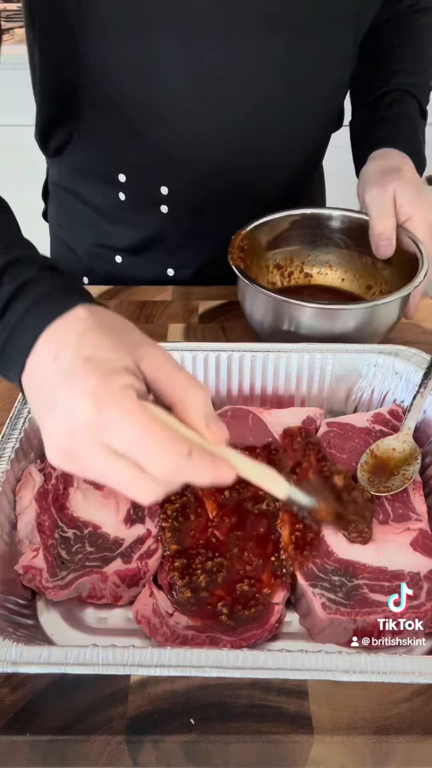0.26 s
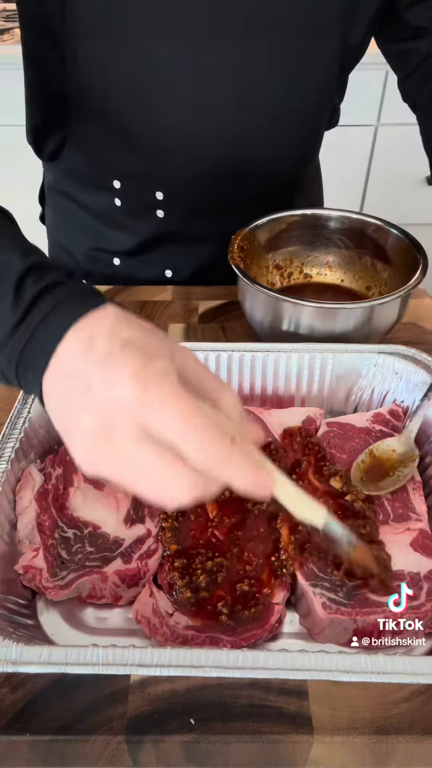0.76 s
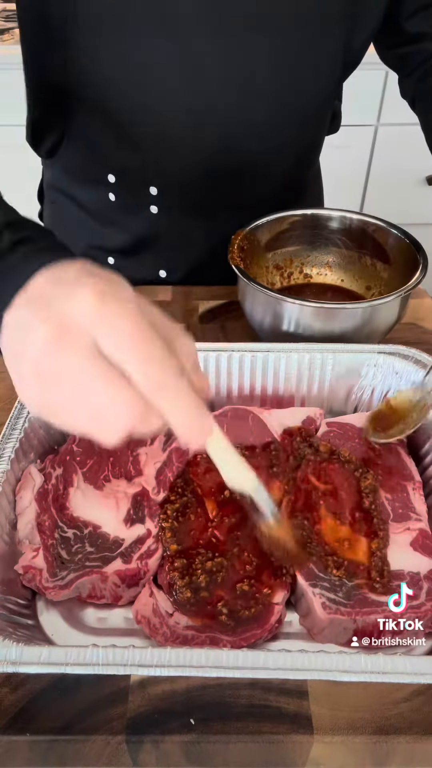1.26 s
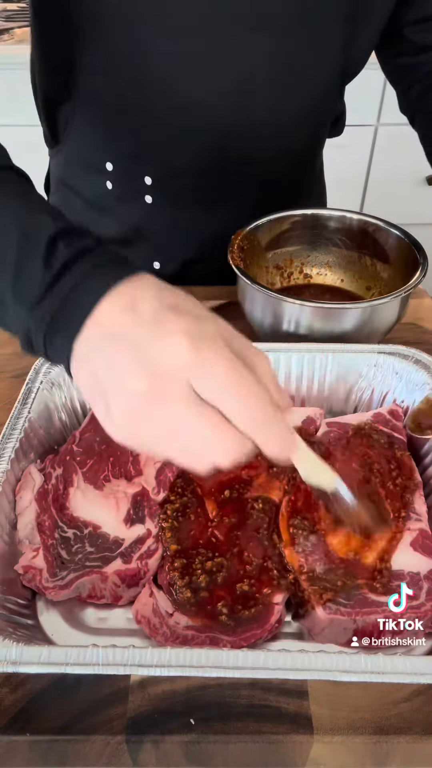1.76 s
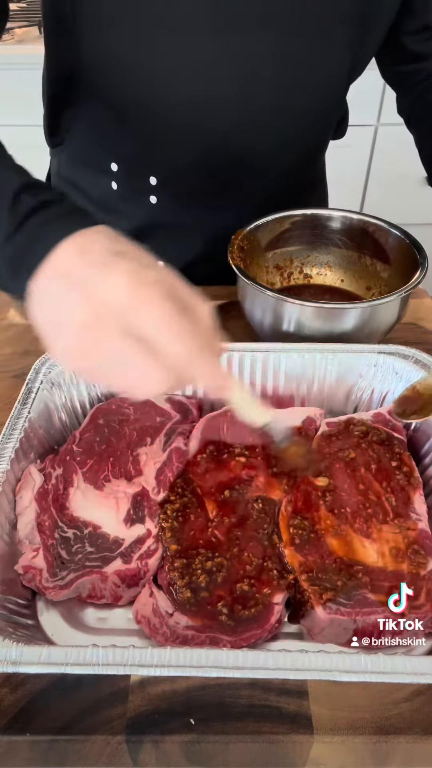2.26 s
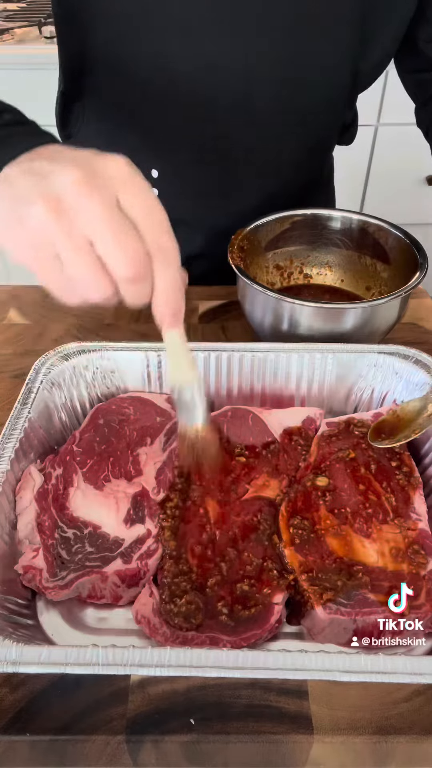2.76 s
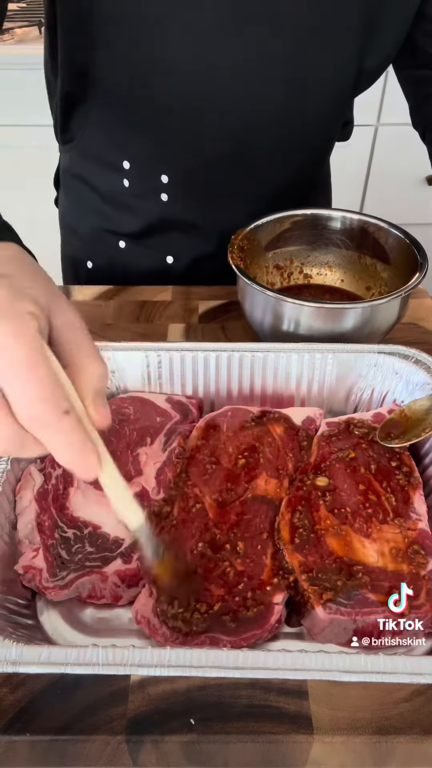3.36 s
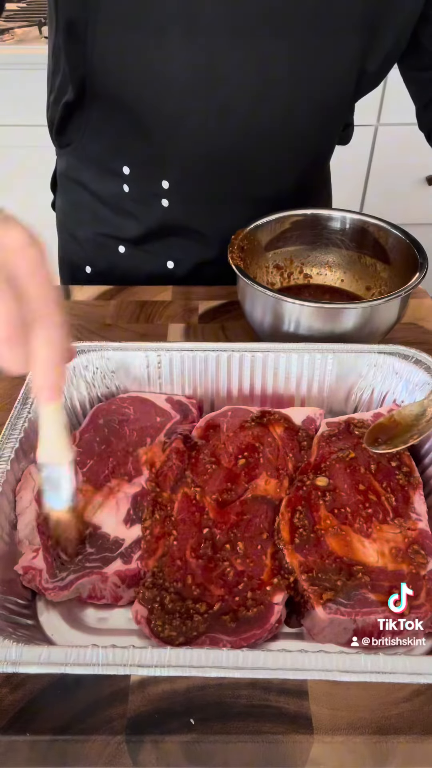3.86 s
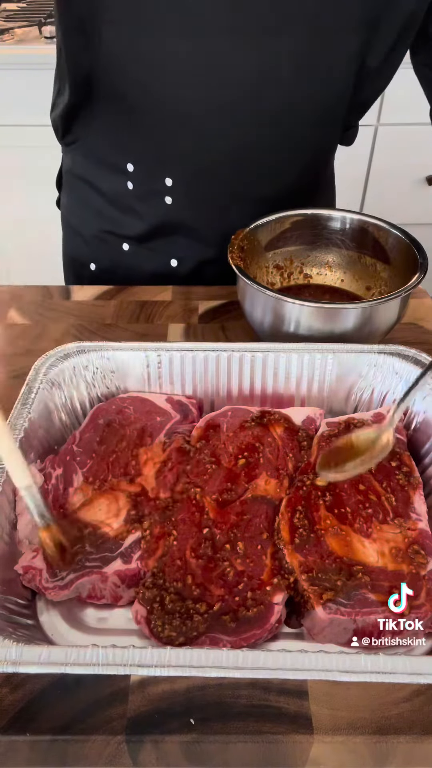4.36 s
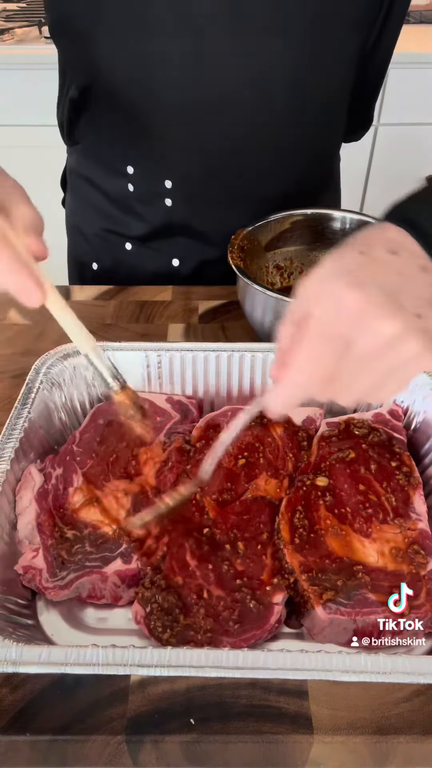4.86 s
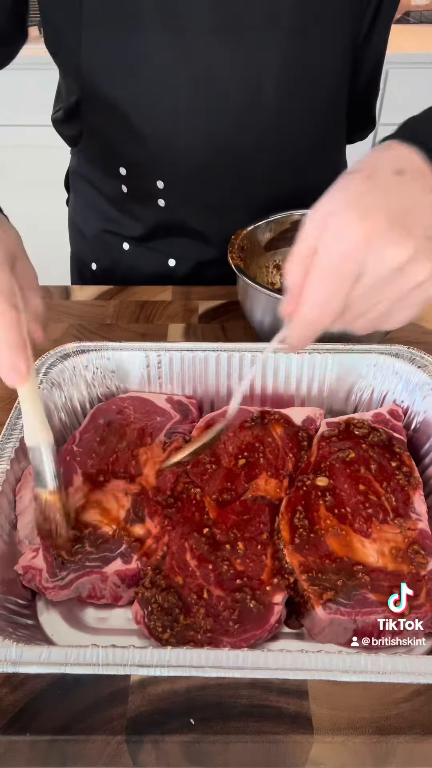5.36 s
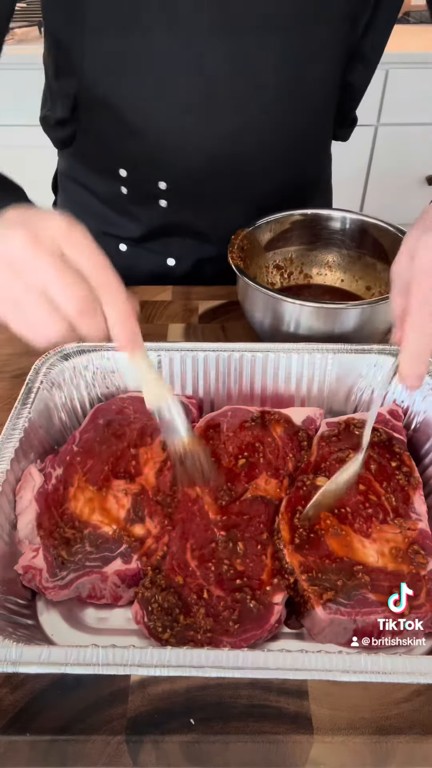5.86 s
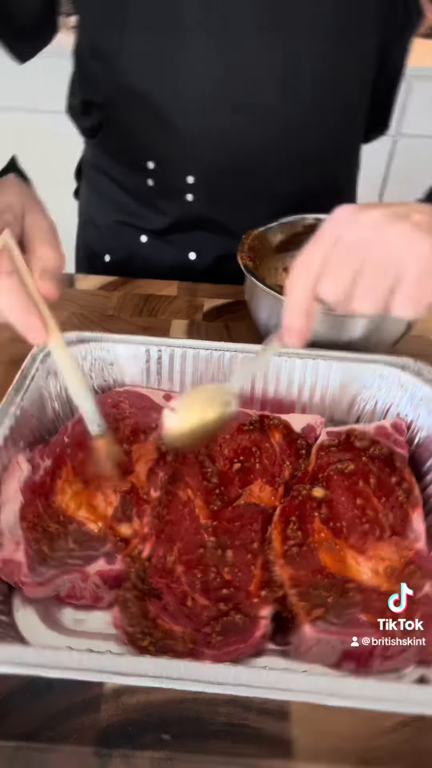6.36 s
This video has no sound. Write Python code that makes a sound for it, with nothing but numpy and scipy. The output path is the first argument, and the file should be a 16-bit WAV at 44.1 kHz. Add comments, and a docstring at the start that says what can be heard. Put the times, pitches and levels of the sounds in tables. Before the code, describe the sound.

In a quiet kitchen, a nudged bowl makes a soft, low thud on a wooden board. A spoon shifts against a foil tray, which buckles in two short clatters, the second louder. Then a brush spreads marinade over steaks in faint, quick swishes, with small sticky ticks and squelches. The microphone is close, and a faint appliance hum lies underneath.

```python
"""A quiet kitchen, a phone microphone close to a foil tray of steaks being brushed with marinade.
First a bowl is nudged and the wooden board gives a soft thud. Around the one-second mark a spoon
moves against the tray, and the foil buckles in two short clatters. Then wet bristles swish over
the meat and films of sticky sauce tick as they break. A faint appliance hum lies under it all."""
import sys
import numpy as np
from scipy import signal
from scipy.fft import rfft, irfft, next_fast_len
from scipy.io import wavfile
from scipy.ndimage import map_coordinates

SR = 44100
rng = np.random.default_rng(int(sys.argv[2]) if len(sys.argv) > 2 else 0)


def generate_wav(signal):
    """Clip the signal to [-1, 1] and save it as 16-bit WAV at the path in sys.argv[1]."""
    frames = np.transpose(np.atleast_2d(signal))
    scaled = np.clip(frames, -1, 1) * 32767
    pcm = np.round(scaled).astype(np.int16)
    wavfile.write(sys.argv[1], SR, pcm)


N = 291774

# the brush going to and fro, about four strokes a second: middle_s, level_db, half_length_s
BRUSH_STROKES = [(0.387, -76, .03), (0.814, -60, .03), (1.377, -65.5, .045), (1.68, -82, .025),
                 (2.012, -64, .025), (2.41, -86, .06), (2.707, -86, 0.022), (3.21, -77.5, .035),
                 (3.512, -74, 0.023), (3.772, -62, 0.036), (3.926, -59, 0.022), (4.098, -77, 0.0233),
                 (4.326, -69, .05), (4.535, -77, .025), (4.739, -75, .028), (5.006, -66.5, 0.031),
                 (5.254, -82, 0.049), (5.525, -78, 0.0513), (5.767, -83, 0.031), (5.925, -77.5, 0.026)]
# the loudest snaps of the sauce: start_s, level_db, pitch_hz
LOUD_SNAPS = [(.0995, -59, 9200), (.2033, -61, 11300), (.3101, -60.5, 11300), (.377, -60.5, 8200),
              (1.475, -50.5, 2630), (2.001, -53.5, 3800), (2.0174, -55, 10900), (2.076, -46.5, 2090),
              (2.079, -51, 3050), (2.2681, -54, 13400), (2.3605, -57, 2880), (2.4278, -65, 11750),
              (3.0108, -54.5, 9200), (3.041, -57.5, 4214), (3.7293, -53.5, 9910), (4.21, -58.5, 3300),
              (4.249, -51, 4370), (4.2502, -48, 12000), (4.5338, -50.5, 12000), (4.6402, -50, 12700),
              (4.644, -54.5, 3150), (5.0648, -60, 9630), (5.754, -56, 3860), (5.76, -56, 5530),
              (6.2682, -60.5, 11940)]
# stereo width of diffuse sound: frequency_hz, side_to_mid_db
DIFFUSE_WIDTH = [(60, -23.5), (200, -9), (500, -3.5), (1200, -1.5), (8000, 2), (11000, -17), (15000, -22)]


def tray(crumple_t60=0.045, crack_t60=0.012, swing_t60=.014, swing_hz=1150, flex_s=0.00069, push_s=0.0033):
    """Buckling foil cracks, swings, rings and pushes on the board; the small patch that pops pings."""
    # buckles of the foil: start_s, level_db, relative_crack_db, brightness_db_per_octave
    buckles = [(0.6669, -45, -22.5, 2.5), (.683, -38, -19, -0.5), (0.7045, -41.5, -19.5, 1),
               (0.7169, -37.5, -24, 1.5), (0.7214, -36, -26.5, 1.5), (0.7256, -36.5, -28, 0),
               (0.734, -43, -20.5, 4), (0.9914, -30.5, -23, -1.5), (1.0383, -26.5, -16, 0.87),
               (1.0634, -32, -16, 1.6), (1.188, -42.5, -17.5, -2), (4.986, -68.5, -24, -1.5)]
    # modes of the loaded tray: pitch_hz, level_db, t60_s
    tray_modes = [(468, -11, .28), (511, -13, .2), (578, -11, .09), (637, -11, .11), (662, -11, .2),
                  (871, -7, .13), (913, -10, .13), (997, -9, .12), (1150, -8, .1), (1193, -7, .11),
                  (1233, -3, .1), (1262, -6, .12), (1342, -7, .08), (1533, -6, .1), (1700, -4, .1),
                  (1860, -7, .04), (2140, -18, .18), (2292, -19, .17), (2800, -15, .04), (3550, -13, .03)]
    # modes of the popping patch: pitch_hz, level_db, t60_s
    dimple_modes = [(7600, -1.5, 0.0089), (8374, -0.5, 0.01161), (9550, -6, 0.015), (11000, -13.5, 0.015)]
    # modes of the tray's floor against the board: pitch_hz, level_db, t60_s
    floor_modes = [(112, -15.5, 0.14), (165, -2, .07), (200, -3, .12), (260, 0, 0.026)]
    # dense foil modes, heard as noise: frequency_hz, level_db
    crumple_spectrum = [(250, -23), (450, 8.5), (900, 1), (1700, -2), (2100, -7.5), (2900, -9.5),
                        (4000, -13), (5500, -26), (16000, -37)]
    # the opening crack: frequency_hz, level_db
    crack_spectrum = [(1500, -16), (3800, 1.5), (5300, -7), (8000, -5), (10600, -3), (16000, -9.5)]
    ring_db, swing_db, thump_db, ping_db = -3, -1.5, -16.5, -1.5  # balance within a buckle
    knocks, pings, t = np.zeros(N), np.zeros(N), np.arange(SR // 3) / SR
    for start_s, db, crack_db, brightness_db in buckles:
        noise = rng.standard_normal((2, len(t)))
        crumple = blow(coloured(noise[0], tilted(crumple_spectrum, brightness_db)) * decay(t, crumple_t60))
        modes = blow(ring(tilted(tray_modes, brightness_db), t, scatter_db=5.5))
        # the sheet snaps through, faster for a harder contact, a moment after the crack
        pitch_hz = swing_hz * np.exp(0.13 * brightness_db)
        swing = blow(np.sin(2 * np.pi * pitch_hz * t) * decay(t, swing_t60))
        sheet = amp(ring_db) * modes + crumple + amp(swing_db) * swing
        body = blow(sheet * (1 - np.exp(-t / flex_s)))
        crack = blow(coloured(noise[1], crack_spectrum) * decay(t, crack_t60))
        thump = blow(ring(floor_modes, t, scatter_db=5.5) * (1 - np.exp(-t / push_s)))
        ping = blow(ring(dimple_modes, t, scatter_db=4.5))
        add(knocks, start_s, amp(db) * (body + amp(crack_db) * crack + amp(thump_db) * thump))
        add(pings, start_s, amp(db + crack_db + ping_db) * ping)
    return knocks, pings


def board():
    """Soft blows make the heavy board and counter boom."""
    # blows on the board: start_s, peak_db, brightness_db_per_octave
    nudges = [(0.0173, -32.5, 2.5), (0.029, -37.5, 4.5), (0.065, -33.5, 0.5), (0.138, -44, -23),
              (0.287, -49.5, -2), (2.357, -66.5, -1), (4.987, -54.5, 5.5)]
    # modes of board and counter: pitch_hz, level_db, t60_s
    board_modes = [(74.17, -5.5, 0.46), (94.6, -6.5, 0.18), (119.5, -1, 0.11), (143, -2, 0.071),
                   (217, -7, 0.041), (298, -11.5, 0.028), (469, -24.5, 0.19), (623, -23, 0.031),
                   (990, -32, 0.02)]
    thuds, t = np.zeros(N), np.arange(SR // 2) / SR
    for start_s, peak_db, brightness_db in nudges:
        boom = ring(tilted(board_modes, brightness_db), t, scatter_db=1)
        add(thuds, start_s, amp(peak_db) * boom / np.abs(boom).max())
    return thuds


def brush(grain_db=2.5, clump_db=3.0, pops_per_s=600):
    """Each stroke swells and fades: countless wet bristles let go of the meat, and sticky threads pop."""
    # the swish of wet bristles: frequency_hz, level_db
    bristle_spectrum = [(1500, -24.5), (2800, -11), (3800, 0.5), (5000, -9), (6500, -6), (8500, -3.5),
                        (11000, -0.5), (13000, -3), (16000, -3)]
    power = sum((amp(db) * swell(s, half_s, fall=1.1)) ** 2 for s, db, half_s in BRUSH_STROKES)
    flicks = unit(rng.standard_normal((2, N)) * amp(grain_db * wobble(1500) + clump_db * wobble(270)))
    pops = unit((rng.random(N) < pops_per_s / SR) * rng.standard_normal((2, N)))
    swish = coloured(flicks + .7 * pops, bristle_spectrum)
    return np.sqrt(power) * spread(*swish, DIFFUSE_WIDTH)


def sauce_snaps(tick_t60=0.011, cavity_t60=0.0049, rise=0.19, tick_db=-15):
    """A sauce film breaks with a tick, higher for a smaller film; its cavity rings upward as it opens."""
    # spectrum of a tick: multiple_of_pitch, level_db
    tick_shape = [(.25, -22), (.6, -9.5), (1, 3), (1.5, -8.5), (3.999, -13)]
    ticks, cavities, t = np.zeros(N), np.zeros(N), np.arange(SR // 16) / SR
    glide = 1 + rise * np.minimum(t / cavity_t60, 1)
    for start_s, db, hz in LOUD_SNAPS + torn_films() + faint_films():
        spectrum = [(multiple * hz, level) for multiple, level in tick_shape]
        tick = coloured(rng.standard_normal(len(t)), spectrum) * decay(t, tick_t60)
        cavity = np.sin(2 * np.pi * hz * np.cumsum(glide) / SR) * decay(t, cavity_t60)
        add(ticks, start_s, amp(db + tick_db) * blow(tick))
        add(cavities, start_s, amp(db) * cavity)
    return ticks, cavities


def torn_films(count=2, within_s=.012, relative_db=-10.5, scatter_octaves=0.19):
    """Each loud snap tears neighbouring films, so that it squelches: start_s, level_db, pitch_hz."""
    start_s, db, hz = np.repeat(LOUD_SNAPS, count, axis=0).T
    delay, detune = rng.random((len(start_s), 2)).T
    pitch_hz = hz * 2 ** (scatter_octaves * (2 * detune - 1))
    return list(zip(start_s + within_s * delay, db + relative_db, pitch_hz))


def faint_films(count=3, level_db=-69.5, scatter_db=3.5, scatter_s=0.031):
    """Every stroke breaks a few small films at random: start_s, level_db, pitch_hz."""
    # pitch range of the small films: low_hz, high_hz
    pitch_range = (7070, 14120)
    low_hz, high_hz = pitch_range
    middles = np.repeat([s for s, _, _ in BRUSH_STROKES], count)
    when, strength = rng.standard_normal((len(middles), 2)).T
    pitch_hz = low_hz * (high_hz / low_hz) ** rng.random(len(middles))
    return list(zip(middles + scatter_s * when, level_db + scatter_db * strength, pitch_hz))


def pressing(light_rumble_db=-74.5, light_smear_db=-83):
    """Over a light, constant contact, each press smears sauce and rocks meat and tray on the board."""
    # brush or spoon leaning on the meat: middle_s, half_length_s, rumble_db, smear_db
    presses = [(.4, 0.39, -77.5, -76.5), (2.55, 0.21, -68.5, -83.5), (4.533, 0.063, -75, -68),
               (5.058, 0.058, -63.5, -78.5), (5.407, .2, -65, -92), (5.88, 0.17, -76.5, -79.5)]
    # the board's rumble: frequency_hz, level_db
    rumble_spectrum = [(25, -33.5), (42, -10), (60, 10), (75, -2), (95, -10), (130, -12.5), (250, -16),
                       (500, -57)]
    # thick sauce smearing: frequency_hz, level_db
    smear_spectrum = [(300, -10), (700, -0.5), (1400, -4.5), (2200, -6), (3800, -9.5), (5000, -19.5),
                      (9000, -34.5)]
    rumble_power, smear_power = amp(light_rumble_db) ** 2, amp(light_smear_db) ** 2
    for middle_s, half_s, rumble_db, smear_db in presses:
        pressure = swell(middle_s, half_s, fall=1)
        rumble_power = rumble_power + (amp(rumble_db) * pressure) ** 2
        smear_power = smear_power + (amp(smear_db) * pressure) ** 2
    rumble = np.sqrt(rumble_power) * wash(rumble_spectrum)
    smear = np.sqrt(smear_power) * amp(1.1 * wobble(45)) * wash(smear_spectrum)
    return rumble + smear


def tiled_walls(x, build_s=0.0033):
    """The walls answer with a diffuse tail that dies at its own speed in each band."""
    # the kitchen's reverberation: frequency_hz, t60_s
    reverb_times = [(150, 0.49), (500, 0.24), (2500, 0.71), (6000, 0.6), (14000, 0.26)]
    hz, t, bands = signal.stft(rng.standard_normal((2, SR)), SR, nperseg=256)
    envelope = decay(t, along(reverb_times, hz)[:, None]) * (1 - np.exp(-t / build_s))
    tail = signal.istft(bands * envelope, SR, nperseg=256)[1]
    mid, side = signal.fftconvolve(x[None], tail / np.linalg.norm(tail[0]), axes=1)[:, :N]
    return spread(mid, side, DIFFUSE_WIDTH)


def room_tone(air_db=-70.5):
    """Kitchen air and the slightly unsteady hum of an appliance."""
    # the appliance's tones: pitch_hz, level_db
    hum_tones = [(59.5, -77), (120, -80), (288, -84), (576, -77), (2051, -90.5), (2945, -99), (3596, -95.5)]
    # the air of the kitchen: frequency_hz, level_db
    air_spectrum = [(25, -27), (40, -8.5), (65, -3), (130, -2), (230, -6.5), (380, -9.5), (560, -8),
                    (680, -11), (990, -23.5), (1900, -16), (3700, -30.5), (5000, -43), (14400, -38),
                    (16000, -42)]
    hum, t = np.zeros(N), np.arange(N) / SR
    for hz, db in hum_tones:
        peak = np.sqrt(2) * amp(db + 0.45 * wobble(3.7))
        hum += peak * np.sin(2 * np.pi * hz * t + 1.3 * wobble(2.3))
    return amp(air_db) * wash(air_spectrum) + hum


def amp(db):
    return 10 ** (np.asarray(db) / 20)


def decay(t, t60):
    return amp(-60 * t / t60)


def unit(x):
    return x / np.sqrt(np.mean(x ** 2) + 1e-20)


def blow(x):
    """x scaled to the energy of 20 ms at rms 1."""
    return x / np.sqrt(np.sum(x ** 2) / (.02 * SR))


def swell(middle_s, half_s, fall):
    """One movement of the hand: the gain builds to 1 and eases off, more steeply for a larger fall."""
    return (1 + ((np.arange(N) / SR - middle_s) / half_s) ** 2) ** -fall


def wobble(rate):
    """A smooth random curve, rate knots a second."""
    return map_coordinates(rng.standard_normal(int(N * rate / SR) + 4), [np.arange(N) * rate / SR])


def ring(modes, t, scatter_db):
    """Damped modes, struck at new strengths each time."""
    hz, db, t60 = np.transpose(modes)[:, :, None]
    sign = (-1) ** np.arange(len(hz))[:, None]
    strength = amp(db + scatter_db * rng.standard_normal(hz.shape))
    return np.sum(sign * strength * decay(t, t60) * np.sin(2 * np.pi * hz * t), axis=0)


def tilted(rows, slope_db):
    """Modes or a spectrum leaning by slope_db per octave: a harder contact favours the highs."""
    return [(hz, db + slope_db * np.log2(hz / 1000), *rest) for hz, db, *rest in rows]


def along(points, hz):
    """A curve through (frequency_hz, value) points, read at hz on a log axis."""
    frequencies, values = np.transpose(points)
    return np.interp(np.log(hz + 1), np.log(frequencies + 1), values)


def filtered(x, response):
    """x with each frequency scaled by response(hz)."""
    n = x.shape[-1]
    padded = next_fast_len(n + SR // 8)
    return irfft(rfft(x, padded) * response(np.fft.rfftfreq(padded, 1 / SR)), padded)[..., :n]


def coloured(x, spectrum):
    """x shaped by a spectrum, at rms 1."""
    return unit(filtered(x, lambda hz: amp(along(spectrum, hz))))


def spread(mid, side, width):
    """Left and right from a mid signal and a side signal scaled by frequency."""
    side = filtered(side, lambda hz: amp(along(width, hz)))
    return np.array([mid + side, mid - side])


def wash(spectrum):
    """Diffuse stereo noise."""
    return spread(*coloured(rng.standard_normal((2, N)), spectrum), DIFFUSE_WIDTH)


def add(track, start_s, sound):
    part = track[max(round(start_s * SR), 0):][:len(sound)]
    part += sound[:len(part)]


def scene():
    """Tray, board and sauce close to the microphone, the kitchen behind them."""
    # stereo width of close sound: frequency_hz, side_to_mid_db
    close_width = [(100, -37.5), (700, -17.5), (2400, -7.5), (4400, -3), (6500, 9.5), (8200, -3.5),
                   (11000, -10), (15000, -25.5)]
    knocks, pings = tray()
    thuds = board()
    ticks, cavities = sauce_snaps()
    close = knocks + pings + thuds + ticks + cavities
    # the two microphone ports hear close sounds with a difference of phase
    direct = spread(close, filtered(close, lambda hz: 1j), close_width)
    # the tiny pings and cavity rings are heard only directly
    reverb = tiled_walls(amp(-10.5) * knocks + amp(-8.5) * (thuds + ticks))
    return direct + reverb + brush() + pressing() + room_tone()


def record(dry, low_cut_hz=19, top_hz=15900):
    """The phone rolls off the deepest bass and keeps nothing above its band limit."""
    low_cut = signal.butter(2, low_cut_hz, "high", fs=SR, output="sos")
    return filtered(signal.sosfilt(low_cut, dry), lambda hz: hz < top_hz)


dry = scene()
out = record(dry)
generate_wav(out)
```